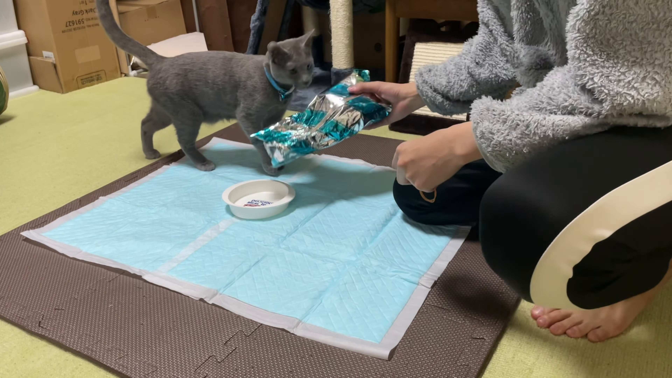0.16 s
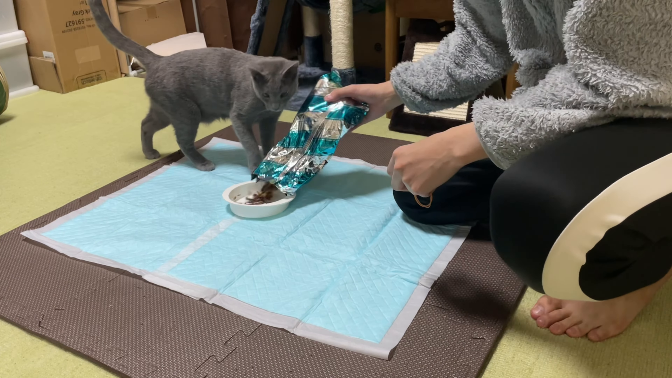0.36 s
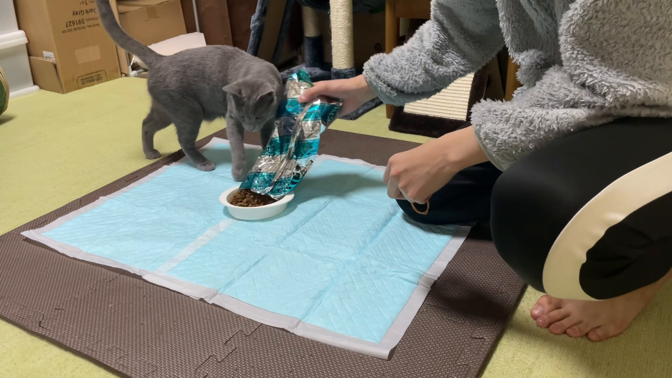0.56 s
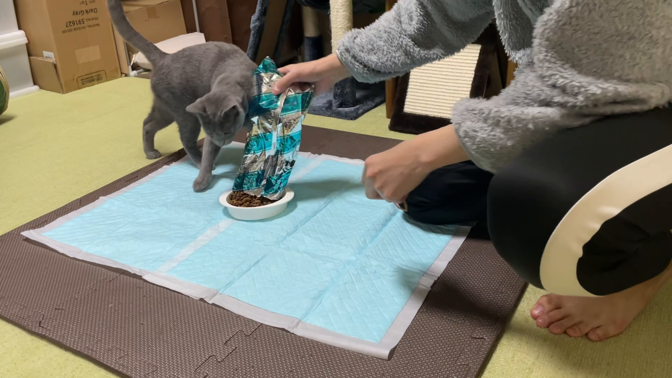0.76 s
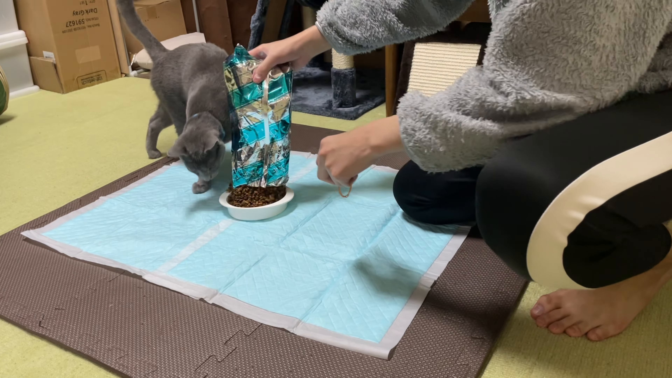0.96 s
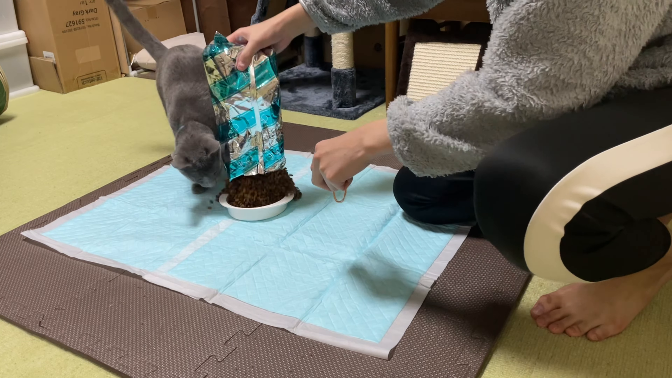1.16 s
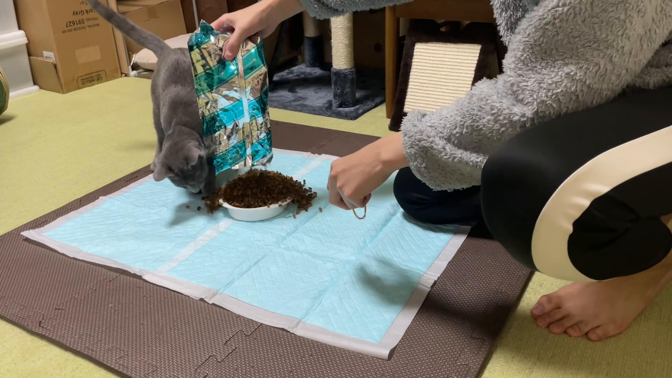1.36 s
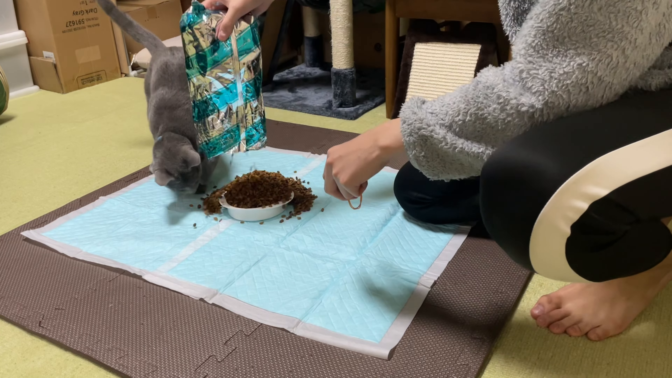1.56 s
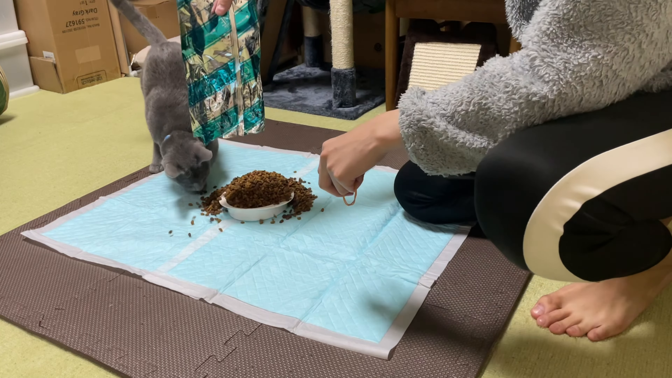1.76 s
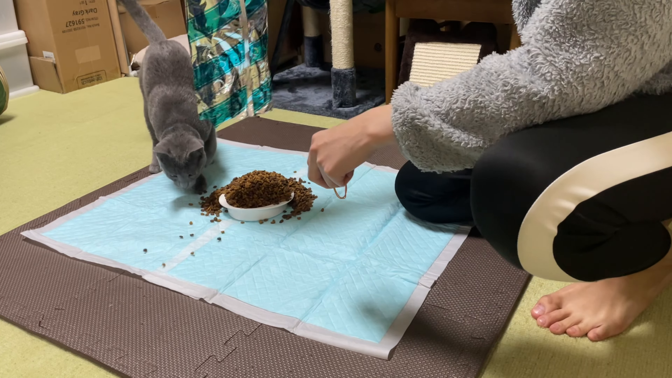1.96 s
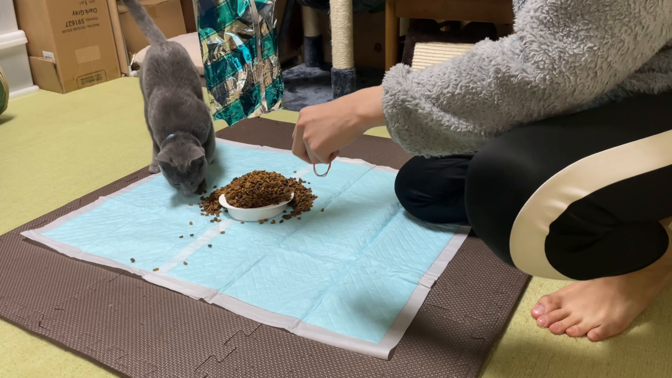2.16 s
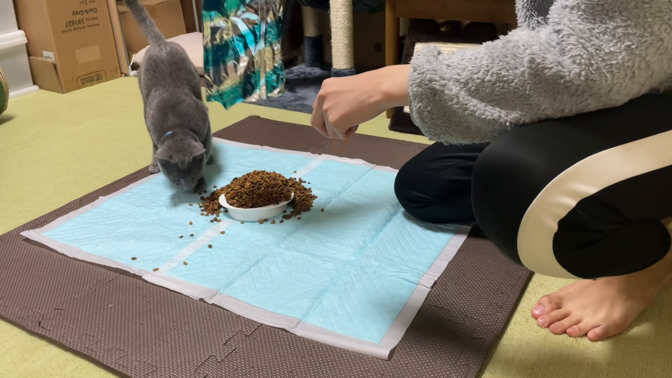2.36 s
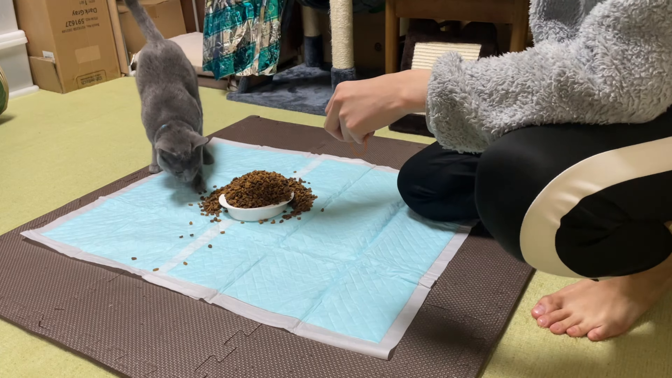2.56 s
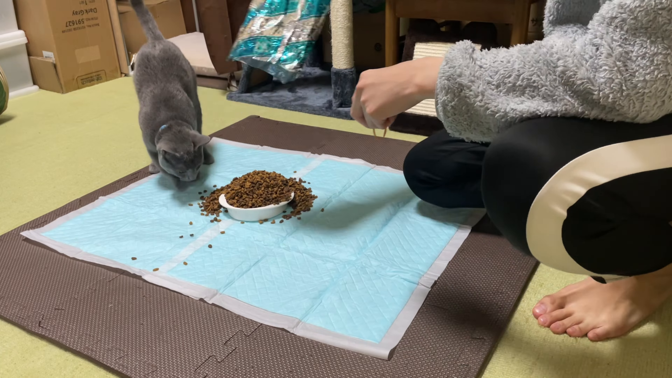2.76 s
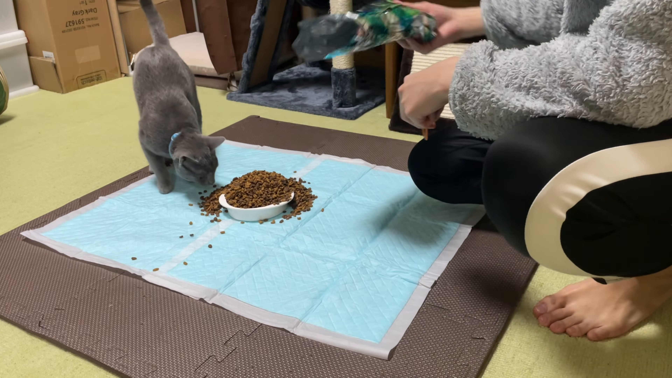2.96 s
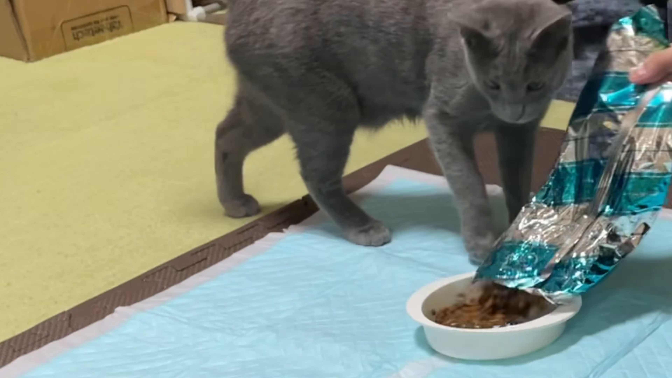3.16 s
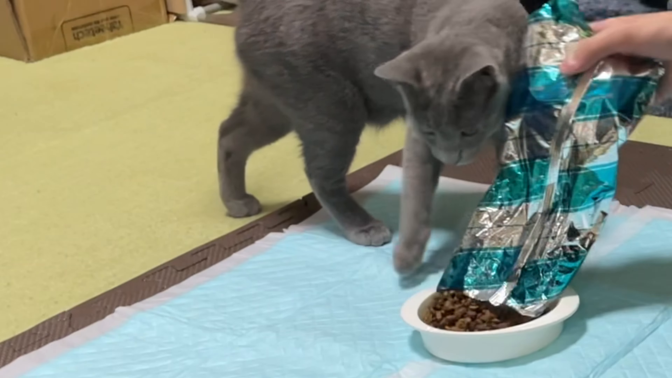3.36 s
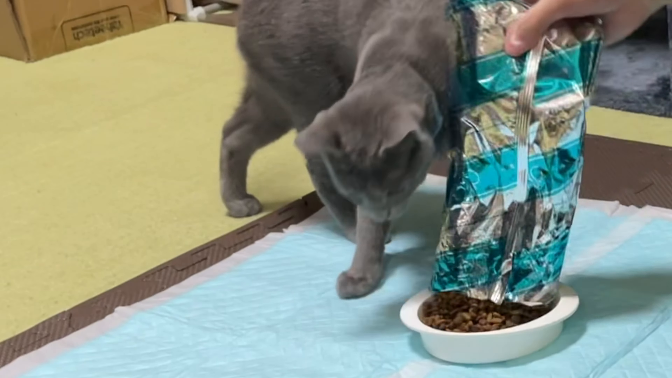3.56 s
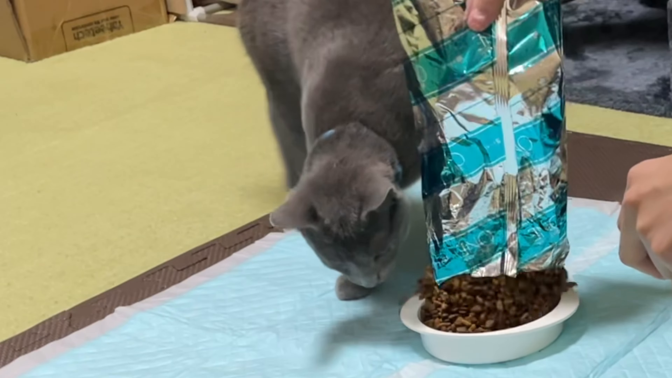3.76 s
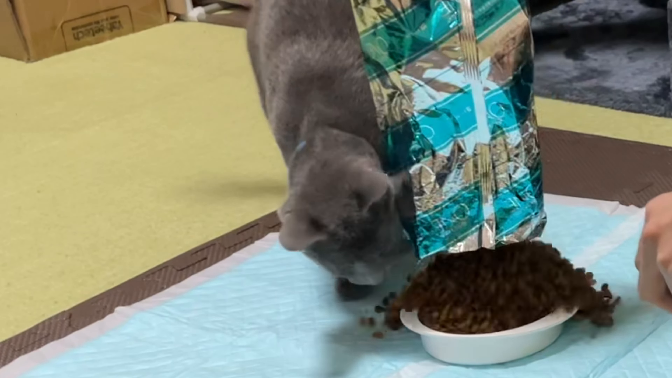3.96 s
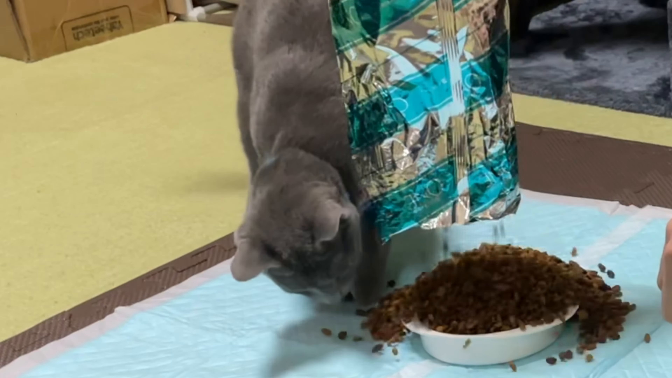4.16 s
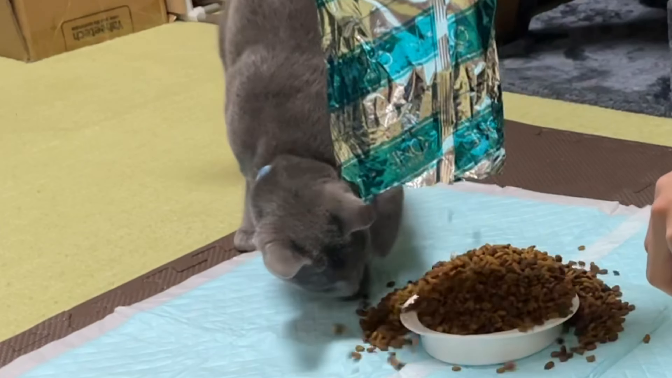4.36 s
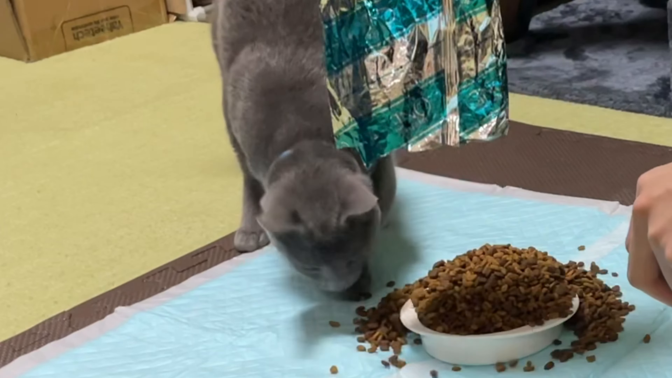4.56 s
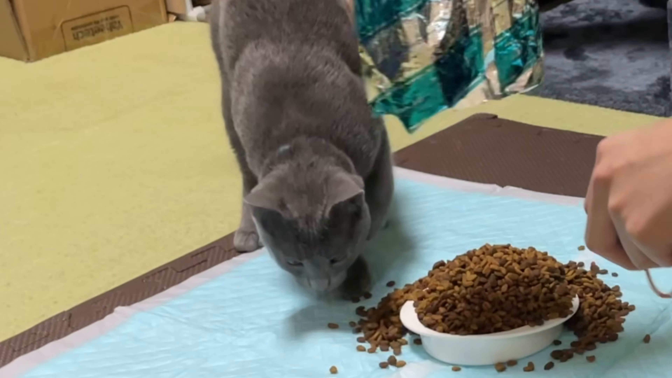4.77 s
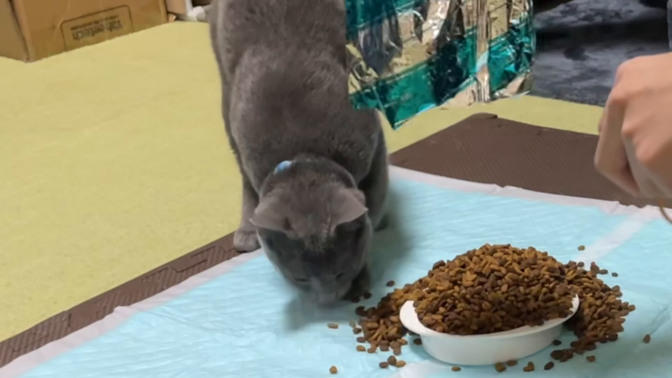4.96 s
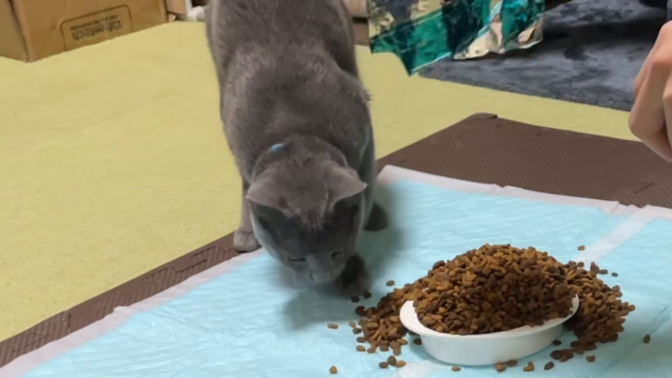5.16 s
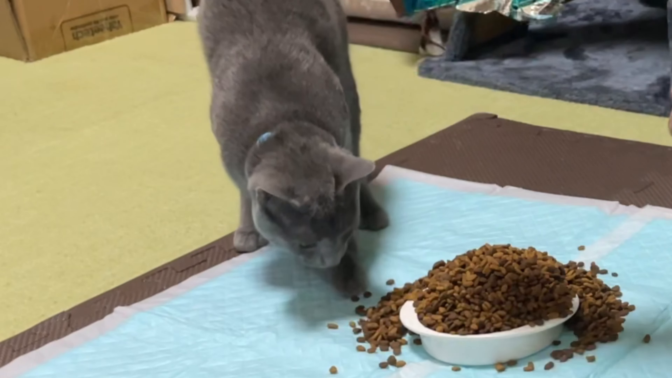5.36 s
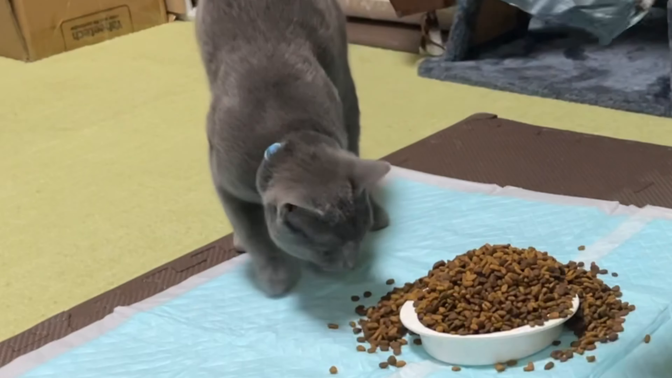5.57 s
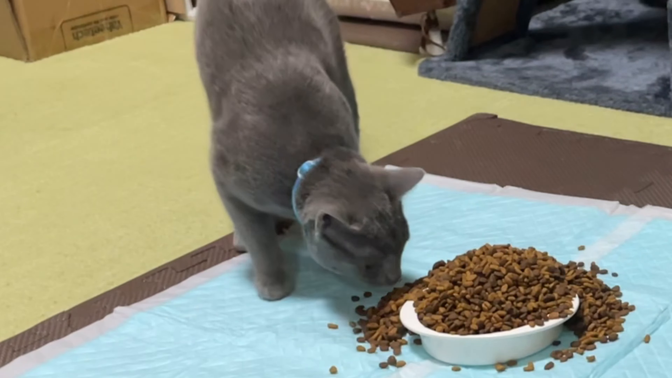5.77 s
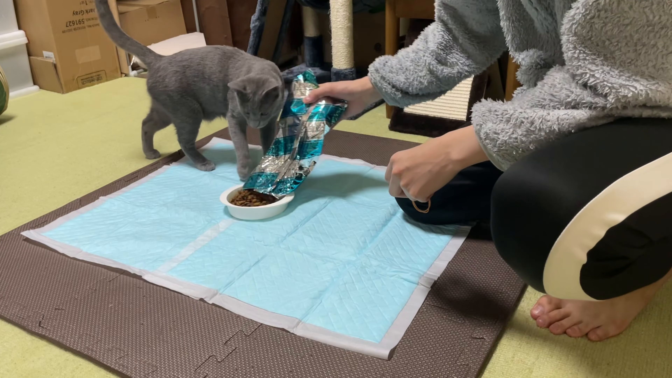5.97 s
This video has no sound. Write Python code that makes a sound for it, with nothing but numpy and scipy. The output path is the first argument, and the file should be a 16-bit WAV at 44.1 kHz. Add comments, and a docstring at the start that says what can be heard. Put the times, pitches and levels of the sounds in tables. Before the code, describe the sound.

Dry kibble rushes from a crinkling foil bag into a small bowl, rattling and spilling, then the same pour repeats up close indoors.

```python
"""Dry cat food is tipped from a foil bag into a small bowl on a padded mat in a living room. Thousands of tiny
random clicks, each ringing like what it touches, make the rattle, patter and foil hiss. Short noise bursts make
the cracks of the foil, one ping of a pellet on the bowl's rim and the knocks of stray pellets; fading low
tones, the bowl thuds. The sound drops out briefly after the first rush; the pour thins out, and a shake snaps
the emptied bag. A low rumble of the house lies beneath. The pour then repeats twice from the end of that gap,
the last time briefly."""
import sys
import numpy as np
from scipy import signal
from scipy.fft import rfft, irfft, next_fast_len
from scipy.io import wavfile
from scipy.ndimage import uniform_filter1d

SR = 44100
rng = np.random.default_rng(int(sys.argv[2]) if len(sys.argv) > 2 else 0)


def to_wav(sig):
    """Store sig (one row per channel, or 1-D mono) as 16-bit WAV at the path in sys.argv[1].

    Samples outside -1..1 are clipped; the rate is SR.
    """
    pcm = np.clip(np.atleast_2d(sig), -1, 1) * 32767
    pcm = np.round(pcm).astype(np.int16)
    wavfile.write(sys.argv[1], SR, pcm.T)  # frames by channels


N = 265041

# The first pellets creep along the tilting bag.
# Each row: time in seconds, relative rattle level in dB, relative foil hiss level in dB.
FIRST_SLIDE = [(0.0, -39.5, -63), (0.058, -50.5, -70.5), (0.074, -38.5, -59.5), (0.18, -43.5, -58.5)]
# The stream from the bag steadies and thins out.
# Each row: time in seconds, relative patter level in dB, relative foil hiss level in dB.
STREAM = [(0.6, -41.5, -47.5), (0.76, -36, -48.5), (0.93, -35, -45.5), (1.15, -36.5, -47), (1.29, -41, -41),
          (1.40, -41.5, -46), (1.52, -51.5, -48), (1.61, -57.5, -50.5), (1.67, -65.5, -61),
          (1.71, -60, -55.5), (1.81, -68.5, -69.5), (2.0, -71, -70.5)]
# Creases of the foil buckle and crack; one row, the faint long ping at 1.964 s, is a pellet striking the bowl's
# rim. Each row: start in seconds, relative level in dB, pitch of the ring (the foil panel, or the rim) in Hz,
# lift at that pitch in dB, brightness in dB per octave.
CRACKS = [(0.0105, -37, 3715, 12.5, -7.5), (0.0618, -27.5, 2443, 15, -5),
          (0.0702, -23.5, 2407, 7.5, 0), (0.0855, -38, 2460, 3.5, -3), (0.089, -32, 3830, 4.5, 0),
          (0.118, -34, 2520, 9.5, 1), (0.1375, -36, 9500, 5, -3.5), (0.1436, -30.5, 2404, 9, -1),
          (0.2038, -26.5, 4525, 3.5, -3.5), (0.2355, -31.5, 2340, 4, 2.5),
          (0.276, -25, 1800, 8, -4.5), (0.303, -19.5, 5780, 1, 7), (0.3336, -14.5, 4370, 2, 3),
          (0.379, -12.5, 6050, 4, -3.5), (0.6726, -25.5, 8670, 15, 0), (0.829, -24, 5900, 10, -5.5),
          (1.584, -33, 9000, 7, 13), (1.602, -32.5, 6030, -2, -0.5), (1.6272, -26.5, 10050, 4, 1),
          (1.6478, -38.5, 5950, 8, 1), (1.661, -31, 6040, 11, -3), (1.6687, -26, 6040, -0.5, 2.5),
          (1.685, -48.5, 4500, -2, 2.5), (1.7638, -31.5, 4080, -2.5, 3),
          (1.852, -40.5, 5900, 0.5, -0.5), (1.865, -34.5, 6070, 3, -1), (1.884, -41.5, 3200, 3.5, -6),
          (1.964, -52, 5850, 26.5, 0.5), (2.0145, -41.5, 9000, 2.5, 0.5),
          (2.0285, -26, 1650, 6.5, -0.5), (2.0315, -19.5, 5030, -3.5, 2),
          (2.0355, -17.5, 1927, 14.5, 0), (2.0475, -32, 5540, 4, -3.5),
          (2.0752, -17.5, 2180, 14.5, 1.5), (2.0936, -13.5, 1907, 12.5, 1),
          (2.102, -28.5, 2680, 7, -2.5), (2.1203, -19, 4200, 15.5, 0), (2.1265, -34.5, 3200, 8.5, 2),
          (2.1325, -31, 4700, 12, -4), (2.139, -41.5, 4400, 13, -2), (2.21, -42, 6050, 6, -1),
          (2.807, -64, 4000, 2, -6), (2.8255, -60, 4800, 10, 4), (2.914, -67.5, 2300, 18, -8),
          (3.047, -66, 5000, 9, 4)]
# Clumps and stray pellets land. Each row: start in seconds, relative level in dB, ring in Hz.
LANDINGS = [(0.302, -20.5, 1000), (0.695, -20.5, 1050), (0.766, -23, 1340), (0.791, -36, 2220),
            (0.825, -21.5, 1480), (0.838, -20.5, 990), (0.9, -25, 1050), (0.946, -18, 2050),
            (0.987, -39.5, 1990), (1.068, -27.5, 780), (1.151, -22.5, 1031), (1.227, -28, 960),
            (1.344, -20, 1970), (1.375, -26, 880), (1.395, -22, 1230), (1.408, -32.5, 1490),
            (1.455, -34.5, 1240), (1.47, -24, 2200), (1.479, -23.5, 2560), (1.541, -33.5, 990),
            (1.5584, -24.5, 2140), (1.6, -52, 770), (1.641, -41, 1100), (1.73, -32.5, 860),
            (1.833, -44.5, 1150), (1.838, -38, 1610), (1.881, -56.5, 1100), (1.906, -52.5, 2000),
            (1.946, -47.5, 1200), (1.972, -51, 1200), (2.0205, -31, 1107), (2.036, -20.5, 1040),
            (2.195, -33.5, 896), (2.224, -42, 2800), (2.2855, -41, 1500), (2.329, -58, 1100)]
# Colour of a sharp foil crease. Each row: frequency in Hz, relative level in dB.
CREASE_COLOUR = [(80, -20), (250, -13), (550, -11), (1000, 1.5), (1400, -5.5), (1900, -3.5), (3000, -4),
                 (4800, -6.5), (7000, 0), (10500, -6), (13000, -12), (16000, -14)]
# Colour of a landing clump. Each row: frequency in Hz, relative level in dB.
KNOCK_COLOUR = [(60, -20.5), (250, -1), (600, 6), (1000, 4), (2100, -2.5), (3200, -5), (5500, -17),
                (14000, -27.5)]

SPLICES_S, REPEAT_FROM_S, POUR_S = (3.204, 5.9074), 0.484, 3.19
TIME = np.arange(int(POUR_S * SR)) / SR
KERNEL = 2048  # samples in one short ring or burst
PLACES = 3  # groups of sounds, each with its own path through the room
RUSH_RATTLE_DB = -31  # rattle of the rush, also the yardstick for the flow


def from_db(db):
    """Turn decibels into a plain gain."""
    return 10 ** (np.asarray(db) / 20)


def in_time(rows):
    """Join the points of each column by straight lines over the whole pour."""
    s, *columns = np.transpose(rows)
    return [np.interp(TIME, s, column) for column in columns]


def at_hz(points, hz, axis=1):
    """Read a table at any frequency, spacing the frequencies by ratio as the ear does."""
    table = np.array(points)
    return np.interp(np.log(hz + 1), np.log(table[:, 0]), table[:, axis])


def filtered(x, response):
    """Make each frequency stronger or weaker, as a function of Hz tells."""
    size = next_fast_len(x.shape[-1] + KERNEL, True)
    spectrum = rfft(x, size) * response(np.fft.rfftfreq(size, 1 / SR))
    return irfft(spectrum, size)[..., :x.shape[-1]]


def add(track, s, sound):
    """Mix a sound into a track, starting at s seconds."""
    part = track[int(s * SR):][:len(sound)]
    part += sound[:len(part)]


def resonate(x, modes):
    """Each resonance, given as Hz, width in Hz and lift in dB, lifts its own band and rings on."""
    for hz, width, db in modes:
        b, a = signal.iirpeak(hz, hz / width, fs=SR)
        x = x + (from_db(db) - 1) * signal.lfilter(b, a, x)
    return x


def swell(s, rise_s, fall_s, hold_s=0):
    """Rise to full level at s, hold, then fall; rise and fall are the times for 20 dB."""
    before = np.maximum(s - TIME, 0) / rise_s
    after = np.maximum(TIME - s - hold_s, 0) / fall_s
    return from_db(-20 * np.minimum(before + after, 10))


def swells(events, rise_s, fall_s):
    """Add up one swell for each row that starts with a time in seconds and a level in dB."""
    return sum(from_db(db) * swell(s, rise_s, fall_s) for s, db, *_ in events)


def clumps(depth_db, length_s=0.0045):
    """Smoothed noise gives an uneven gain that swells and sinks in lumps of about this length."""
    drift = uniform_filter1d(rng.standard_normal(len(TIME)), max(int(length_s * SR), 1))
    gain = from_db(depth_db * drift / drift.std())
    return gain / np.sqrt(np.mean(gain ** 2))


def contact(colour, ripple_db=4.5, count=70):
    """The ring of one touch, of unit energy: the common colour with random peaks of its own."""
    hz = np.fft.rfftfreq(KERNEL, 1 / SR)
    own = np.column_stack([np.geomspace(100, SR / 2, count), rng.normal(0, ripple_db, count)])
    # folding the cepstrum makes the ring start at once and die away (minimum phase)
    cepstrum = irfft(np.log(from_db(at_hz(colour, hz) + at_hz(own, hz))))
    cepstrum[1:KERNEL // 2] *= 2
    cepstrum[KERNEL // 2 + 1:] = 0
    ring = irfft(np.exp(rfft(cepstrum)))
    return ring / np.linalg.norm(ring)


def contact_rate():
    """Touches come faster in a stronger flow: a trickle, plus a share that grows with the flow."""
    trickle_per_s, full_flow_per_s = 450, 3000
    flow_db = np.where(TIME < REPEAT_FROM_S, in_time(FIRST_SLIDE)[0], in_time(STREAM)[0])
    flow = np.hypot(rush(), from_db(flow_db - RUSH_RATTLE_DB))
    return trickle_per_s + full_flow_per_s * flow


def grains(colour, level, spread_db, density=1, ripple_db=3.5, count=30):
    """Random touches, at density times the contact rate, set differently ringing pellets off; one row per place."""
    chance = np.clip(density * contact_rate(), 1, SR) / SR
    sizes = from_db(spread_db * np.minimum(rng.exponential(1, len(TIME)), 3.5))
    sizes *= rng.choice([-1, 1], len(TIME)) / np.sqrt(np.mean(sizes ** 2))
    # rarer clicks are made larger, so that the level stays as set
    clicks = (rng.random(len(TIME)) < chance) * sizes * level / np.sqrt(chance)
    dealt = rng.integers(0, count, len(TIME))
    out = np.zeros((PLACES, len(TIME)))
    for k in range(count):
        ring = contact(colour, ripple_db)
        out[k % PLACES] += signal.oaconvolve(clicks * (dealt == k), ring)[:len(TIME)]
    return out


def burst(colour, rise_s, t60):
    """A dense cluster of touches builds up and dies quickly (t60: time to fall 60 dB), at a fixed energy."""
    t = np.arange(KERNEL) / SR
    envelope = (1 - np.exp(-t / rise_s)) * from_db(-60 * t / t60)
    cluster = rng.choice([-1, 1], KERNEL) * envelope
    sound = signal.fftconvolve(cluster, contact(colour, ripple_db=0.5))
    return sound / np.linalg.norm(sound) * np.pi


def diffuse(size):
    """White noise from all sides reaches the two microphone ports, partly alike."""
    # Each row: frequency in Hz, likeness of the two ports (1 alike, 0 unrelated, below 0 opposed).
    likeness = [(100, .96), (250, .9), (360, .6), (520, -.2), (900, -.2), (1500, 0), (2200, .4), (3200, .3),
                (4200, -.2), (5700, -.2), (7300, .9), (9000, .55), (11000, .9), (13000, .3)]
    mid, side = rng.standard_normal((2, size))
    mid = filtered(mid, lambda hz: np.sqrt((1 + np.clip(at_hz(likeness, hz), -1, 1)) / 2))
    side = filtered(side, lambda hz: np.sqrt((1 - np.clip(at_hz(likeness, hz), -1, 1)) / 2))
    return np.array([mid + side, mid - side])


def pellet_flow():
    """Strengths of the first slide's rattle and hiss, the patter inside the bag and outside, and the pour's hiss."""
    # How much of the patter still comes from inside the bag. Each row: time in seconds, share 0-1.
    share_in_bag = [(0.5, 1), (0.65, 0.37), (0.85, 0.7), (1.3, 0.47)]
    sliding = TIME < REPEAT_FROM_S
    falling = ~sliding * np.interp(TIME, [2.0, 2.1], [1, 0])
    slide_rattle, slide_hiss = from_db(in_time(FIRST_SLIDE)) * sliding
    patter, pour_hiss = from_db(in_time(STREAM)) * falling
    inside = np.clip(in_time(share_in_bag)[0], 0, 1)
    return slide_rattle, slide_hiss, patter * np.sqrt(inside), patter * np.sqrt(1 - inside), pour_hiss


def kibble():
    """Pellets rattle down the bag, fall on the heap and spill over, scraping the foil all the while."""
    slide_rattle, slide_hiss, inside, outside, pour_hiss = pellet_flow()
    landing = landing_strength(outside)
    ringing = bag_ring(bag_rattle(slide_rattle + inside) + heap_patter(landing))
    return ringing + hard_bounces(landing) + mat_thuds(landing) + foil_hiss(slide_hiss + pour_hiss)


def bag_rattle(rattle):
    """Pellets knock about inside the bag, which has extra resonances while it is still full."""
    # Colour of a touch inside the bag. Each row: frequency in Hz, relative level in dB.
    bag_colour = [(40, -30), (80, -16.5), (150, -15.5), (300, -4.5), (480, -7), (570, -1.5), (750, -1),
                  (1150, -3), (1800, -10.5), (2400, -10.5), (3500, -12), (6000, -19), (15000, -48.5)]
    # Resonances of the full bag. Each row: frequency in Hz, width in Hz, lift in dB.
    full_bag_modes = [(587, 50, 4), (775, 30, 3), (1020, 40, 3)]
    rattle = rattle + from_db(-46) * shake()
    rattle = np.hypot(rattle, from_db(RUSH_RATTLE_DB) * rush())
    uneven = rattle * clumps(depth_db=1.0, length_s=0.0055)
    sound = grains(bag_colour, uneven, spread_db=2.5, ripple_db=6.0)
    full = np.interp(TIME, [.13, .3], [1, 0])
    return resonate(sound * full, full_bag_modes) + sound * (1 - full)


def foil_hiss(hiss):
    """Many fine scrapes on the foil hiss; in the rush the hiss rises and falls faster than the rattle."""
    # Colour of a scrape on the foil. Each row: frequency in Hz, relative level in dB.
    foil_colour = [(200, -35.5), (1000, -7), (2500, -10.5), (4000, 2), (5000, -3.5), (6200, 8.5),
                   (7500, -1), (9000, 6.5), (11000, 0), (13000, -4.5), (15500, -7), (17000, -20.5)]
    rush_hiss = from_db(-29) * swell(0.33, rise_s=0.052, fall_s=0.13, hold_s=0.18)
    return grains(foil_colour, np.hypot(hiss, rush_hiss), spread_db=2.5, density=2.5, ripple_db=4.5)


def landing_strength(outside):
    """The uneven patter outside the bag, plus a small shower of pellets with each landing clump."""
    patter = outside * from_db(-1) * clumps(depth_db=1.0)
    showers = from_db(-22.5) * swells(LANDINGS, rise_s=0.0061, fall_s=0.031)
    return np.hypot(patter, showers)


def heap_patter(landing):
    """Pellets patter on their own heap, and the bowl and open bag above it resonate."""
    # Colour of a touch on the heap. Each row: frequency in Hz, relative level in dB.
    heap_colour = [(35, -30.5), (60, -16.5), (120, -4.5), (190, -5.5), (260, -1), (370, -2), (500, -9.5),
                   (700, -7), (1100, -6.5), (1450, -9), (2000, -4.5), (2800, -13.5), (4200, -20.5),
                   (7000, -36), (15000, -51)]
    # Resonances of the bowl and open bag. Each row: frequency in Hz, width in Hz, lift in dB.
    cavity_modes = [(251, 47, 1.5), (770, 24, 9.5), (1040, 220, 5.5), (3200, 160, 10)]
    return resonate(grains(heap_colour, landing, spread_db=2.5, density=.62, ripple_db=7.0), cavity_modes)


def hard_bounces(landing):
    """A few pellets bounce hard and stand out, with strongly differing rings."""
    return grains(KNOCK_COLOUR, from_db(-7) * landing, spread_db=6.5, density=0.043, ripple_db=9.5)


def mat_thuds(landing):
    """The mat thuds softly under the stream, and again as the bowl overflows."""
    # Colour of a thud on the mat. Each row: frequency in Hz, relative level in dB.
    mat_colour = [(20, -25.5), (40, -6.5), (65, 4), (110, 0.5), (170, -5), (280, -4.5), (600, -18),
                  (1200, -19.5), (4000, -55.5)]
    spill = from_db(-53.5) * swell(1.6, rise_s=0.22, fall_s=0.37)
    return grains(mat_colour, from_db(-20) * landing + spill, spread_db=8.0)


def bag_ring(x, width_hz=260, size=256):
    """The main resonance of the bag glides as the load inside shifts; its pitch is reset every few ms."""
    # Each row: time in seconds, pitch in Hz, lift in dB.
    glide = [(0.0, 2250, 8.5), (0.07, 2430, 8), (0.25, 2350, 7.5), (0.4, 2230, 2.5), (0.65, 2440, 6.5),
             (0.85, 2160, 4), (0.96, 2033, 8.5), (1.06, 2150, 2.5), (1.17, 2190, 6.5), (1.5, 2250, 2)]
    hz, db = in_time(glide)
    band, state = np.zeros_like(x), np.zeros((len(x), 2))
    for i in range(0, len(TIME), size):
        b, a = signal.iirpeak(hz[i], hz[i] / width_hz, fs=SR)
        band[:, i:i + size], state = signal.lfilter(b, a, x[:, i:i + size], zi=state)
    return x + (from_db(db) - 1) * band


def ambience(level_db=-59, waver_db=1.1):
    """Filtered noise makes the low rumble of the house, wavering a little above the deep bass."""
    # Each row: frequency in Hz, relative level in dB.
    house_colour = [(15, -37), (30, -25), (45, -7), (60, 5), (78, 3), (105, -1), (160, -4.5), (230, -4),
                    (350, -12), (520, -12.5), (660, -18), (800, -24), (1000, -25.5), (2000, -41),
                    (4000, -41), (10000, -45), (16000, -56.5)]
    noise = filtered(diffuse(len(TIME)), lambda hz: from_db(at_hz(house_colour, hz)))
    bass = filtered(noise, lambda hz: hz < 160)
    wavering = (noise - bass) * clumps(waver_db, length_s=0.053)
    return from_db(level_db) * (bass + wavering) / noise.std()


def cracks():
    """Each buckling crease gives a dry crack, coloured by the panel of foil beside it; the one pellet on the
    bowl's rim pings at its own pitch."""
    panel_width = 0.76  # width of a slack panel's ring, as a share of its pitch
    out = np.zeros((PLACES, len(TIME)))
    for k, (s, db, hz, lift_db, tilt_db) in enumerate(CRACKS):
        colour = [(f, level + tilt_db * np.log2(f / hz)) for f, level in CREASE_COLOUR]
        crack = burst(colour, rise_s=0.00034, t60=0.011)
        # a higher lift makes the panel's ring narrower and longer
        width = panel_width * hz / from_db(max(lift_db, 0))
        add(out[k % PLACES], s, from_db(db) * resonate(crack, [(hz, width, lift_db)]))
    return out


def foil_rustle():
    """Creases crinkle crisply and limp foil bends softly as the emptied bag is lifted and drawn back."""
    # Each row: time in seconds, relative crisp level in dB, relative soft level in dB.
    rustles = [(1.635, -48, -71.5), (1.76, -59, -78), (2.445, -80, -64), (2.55, -80, -72.5),
               (2.605, -91, -62), (2.68, -80.5, -80), (2.825, -88, -64.5), (2.915, -86, -85),
               (3.05, -87, -76)]
    # Colour of limp foil. Each row: frequency in Hz, relative level in dB.
    limp_colour = [(150, -28.5), (600, 13.5), (1250, 1.5), (1800, -4), (2500, -6.5), (4500, -12),
                   (8000, -23), (16000, -25)]
    crisp = swells(rustles, rise_s=0.034, fall_s=0.15)
    # every crack brings a brief crinkle with it
    crisp = crisp + from_db(-27.5) * swells(CRACKS, rise_s=0.0038, fall_s=0.047)
    soft = swells([(s, soft_db) for s, _, soft_db in rustles], rise_s=0.03, fall_s=.05)
    return (grains(CREASE_COLOUR, crisp, spread_db=4.0, density=2.2)
            + grains(limp_colour, soft, spread_db=3.0, density=1.4, count=12))


def bowl_thuds(level_db=1.0, rise_s=0.0035, t60=0.061):
    """Heavy clumps push the heap and the bowl into the mat: a soft, low boom that dies quickly."""
    # Each row: start in seconds, relative level in dB, boom in Hz.
    booms = [(0.106, -32, 380), (0.624, -30, 233), (0.692, -30.5, 250), (0.72, -29, 282),
             (0.765, -35.5, 322), (0.801, -27.5, 386), (0.887, -29.5, 251), (0.925, -28.5, 304),
             (0.99, -37, 370), (1.074, -29.5, 238), (1.115, -26.5, 404), (1.155, -34, 220),
             (1.233, -48, 282), (1.349, -34, 243), (1.556, -35, 253), (1.649, -39, 293), (1.67, -43, 260),
             (1.729, -41.5, 213), (2.04, -60.5, 283), (2.195, -47, 197)]
    out = np.zeros((PLACES, len(TIME)))
    t = np.arange(4 * KERNEL) / SR
    envelope = (1 - np.exp(-t / rise_s)) * from_db(-60 * t / t60)
    for k, (s, db, hz) in enumerate(booms):
        boom = envelope * np.sin(2 * np.pi * hz * t)
        add(out[k % PLACES], s, from_db(db + level_db) * boom)
    return out


def stray_pellets(width_hz=340, ring_db=7):
    """Single clumps knock on the heap and the mat, each with a pitch of its own."""
    out = np.zeros((PLACES, len(TIME)))
    for k, (s, db, hz) in enumerate(LANDINGS):
        knock = resonate(burst(KNOCK_COLOUR, rise_s=0.00034, t60=0.03), [(hz, width_hz, ring_db)])
        add(out[k % PLACES], s, from_db(db) * knock)
    return out


def rush():
    """Strength, 0-1, of the rush in which the whole load lets go."""
    return swell(0.33, rise_s=0.15, fall_s=0.2, hold_s=0.18)


def dropout(cut_fall_s=0.0023, blip_rise_s=0.0021):
    """Gain of a brief gap: a sudden cut, one blip, a quick fade back in."""
    cut_s, blip_s, return_s, return_fade_s = 0.445, 0.4652, 0.485, 0.022
    before = from_db(-20 * np.clip((TIME - cut_s) / cut_fall_s, 0, 10))
    blip = from_db(-4.5) * swell(blip_s, blip_rise_s, cut_fall_s)
    after = np.clip((TIME - return_s) / return_fade_s, 0, 1)
    return np.maximum(before + blip + after, from_db(-39.5))  # never quite silent


def shake():
    """Effort, 0-1, of the one shake that rattles the last pellets."""
    return swell(2.026, rise_s=0.0046, fall_s=.018, hold_s=0.086)


def room(x, first_echo_s=.004, tail_s=.5):
    """The direct sound is followed by a diffuse tail that dies sooner in the treble."""
    # Each row: frequency in Hz, time to fall 60 dB in seconds.
    room_t60 = [(150, .33), (1000, .30), (5000, .27), (14000, .22)]
    # Each row: frequency in Hz, reverberation against direct sound in dB.
    room_level = [(150, 1), (1000, -3.5), (5000, -6), (12000, -22)]
    t = np.arange(int(tail_s * SR)) / SR
    noise, tail = diffuse(len(t)), 0
    edges = np.append(0, np.geomspace(125, SR / 2, 9))
    for low, high in zip(edges, edges[1:]):
        centre = (low + high) / 2
        decay = from_db(-60 * t / at_hz(room_t60, centre)) * (t > first_echo_s)
        band = filtered(noise, lambda hz: (hz >= low) & (hz < high))
        tail = tail + band * decay / np.linalg.norm(decay) * from_db(at_hz(room_level, centre))
    return x + signal.fftconvolve(x[None], tail, axes=1)[:, :len(x)]


def scatter(x, level_db=-6, t60=0.012):
    """Cat, hands and floor throw back the sound within milliseconds, differently to each port."""
    t = np.arange(KERNEL // 2) / SR
    decay = from_db(-60 * t / t60)
    echoes = diffuse(len(t)) * decay / np.linalg.norm(decay)
    return from_db(level_db) * signal.oaconvolve(x[None], echoes, axes=1)[:, :len(x)]


def ports(x):
    """The two microphone ports differ in level and phase, depending on frequency."""
    # Each row: frequency in Hz, left against right in dB, phase by which left leads in radians.
    port_difference = [(100, -1.9, -.1), (250, -5.2, -.15), (360, -7.5, -.1), (440, -5, -.2),
                       (580, 0, -2.8), (880, 6.3, -2.4), (1080, 2.7, -.8), (1450, -.5, -.3),
                       (1750, -3.6, .3), (2100, .2, .8), (3200, .6, .8), (4100, 3.6, 1.3), (5400, 5.4, .7),
                       (5950, 1, -2.0), (7400, .2, -3.15), (9000, .2, -4.5), (11000, 0, -6.28),
                       (14600, 0, -9.4)]
    side = np.array([[.5], [-.5]])

    def response(hz):
        """Half of the difference goes to each port, in opposite directions."""
        gain = from_db(side * at_hz(port_difference, hz))
        gain = gain / np.sqrt(np.mean(gain ** 2, axis=0))
        return gain * np.exp(1j * side * at_hz(port_difference, hz, axis=2))
    return filtered(x, response)


def scene(sources_db=-2.0):
    """One pour, each place with its own path through the room; then its later part again at each splice."""
    sources = kibble() + cracks() + foil_rustle() + bowl_thuds() + stray_pellets()
    sources = from_db(sources_db) * sources
    arriving = sum(room(place) + scatter(place) for place in sources)
    pour = ports(arriving + ambience()) * dropout()
    out = np.zeros((2, N))
    for track, channel in zip(out, pour):
        add(track, 0, channel)
        for s in SPLICES_S:
            add(track, s, channel[int(REPEAT_FROM_S * SR):])
    return out


def record(dry):
    """A steep low-pass filter removes the very top of the treble."""
    cutoff_hz = 16200
    low_pass = signal.ellip(12, .2, 100, cutoff_hz, fs=SR, output="sos")
    return signal.sosfilt(low_pass, dry)


dry = scene()
out = record(dry)
to_wav(out)
```